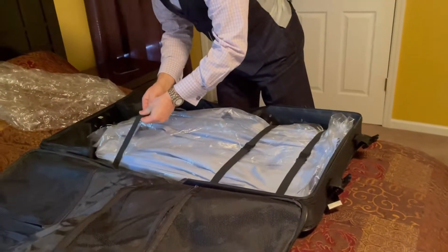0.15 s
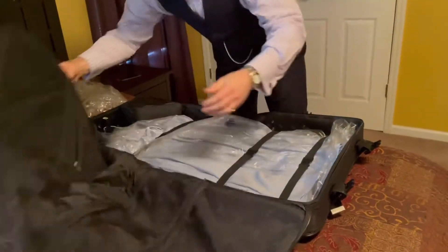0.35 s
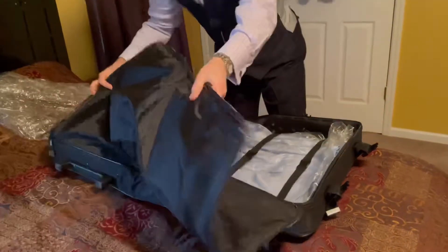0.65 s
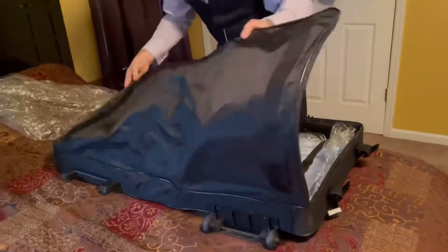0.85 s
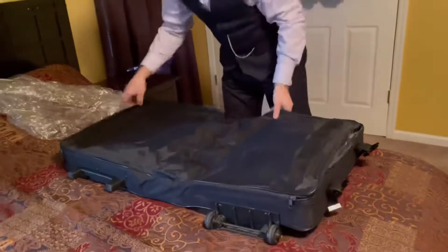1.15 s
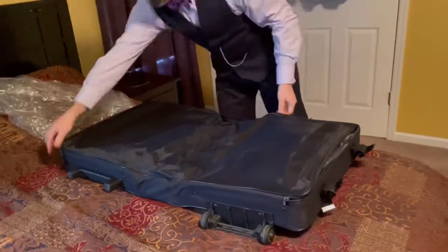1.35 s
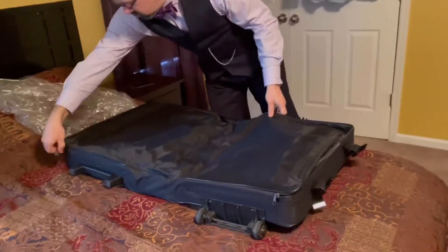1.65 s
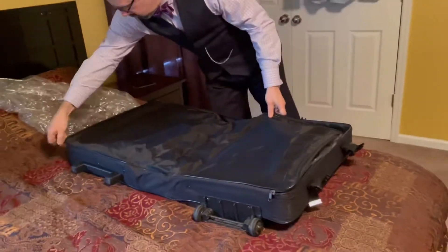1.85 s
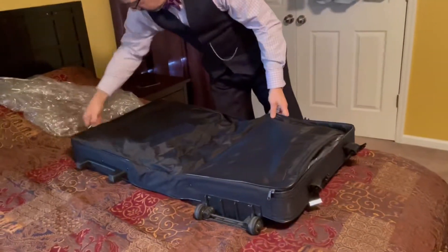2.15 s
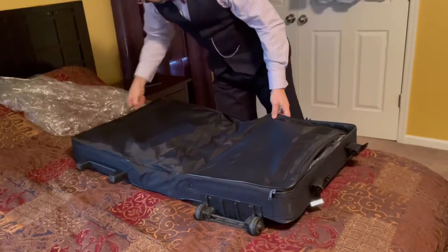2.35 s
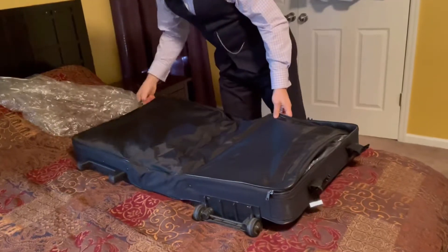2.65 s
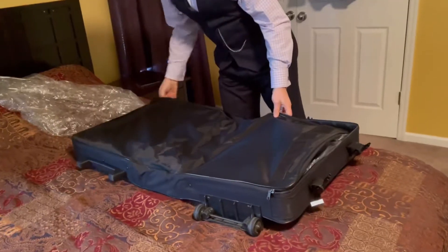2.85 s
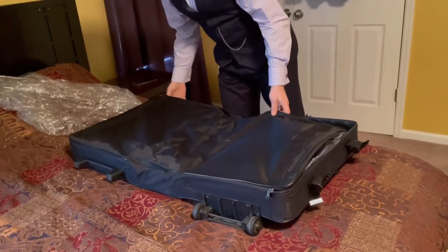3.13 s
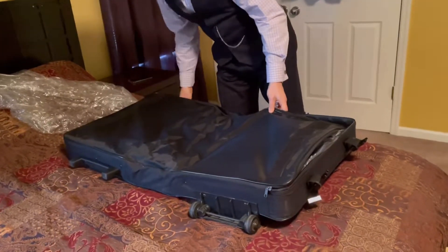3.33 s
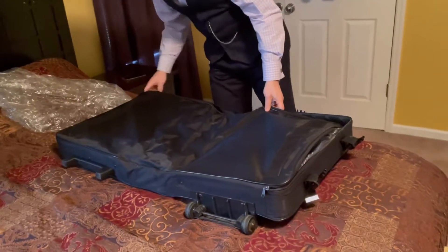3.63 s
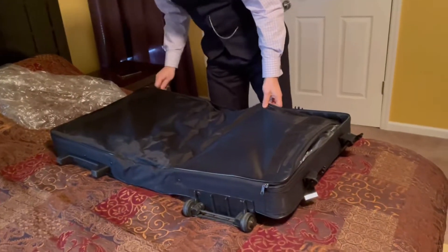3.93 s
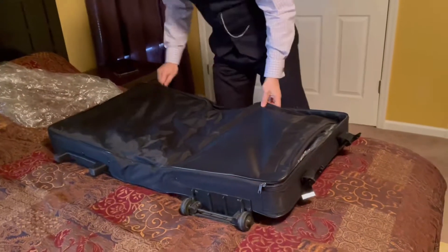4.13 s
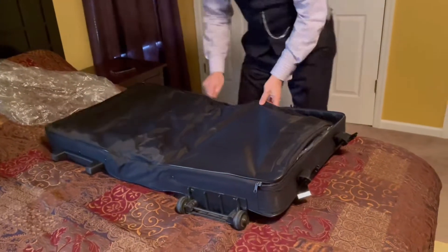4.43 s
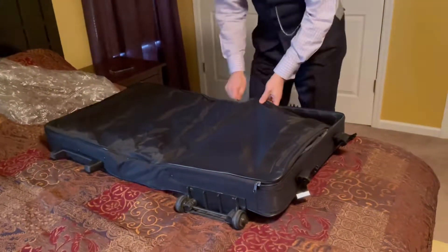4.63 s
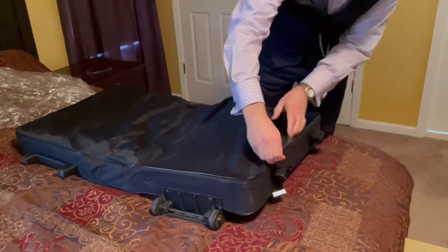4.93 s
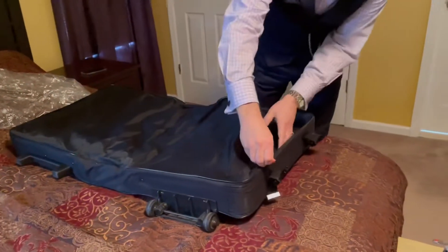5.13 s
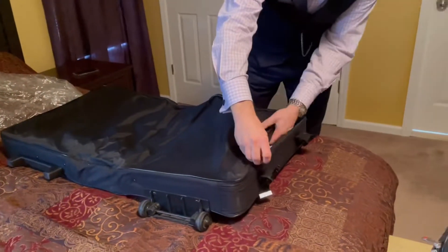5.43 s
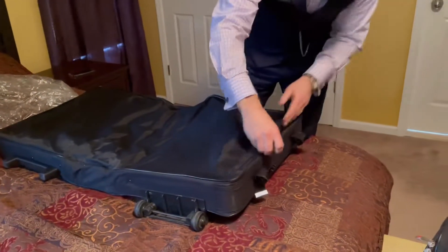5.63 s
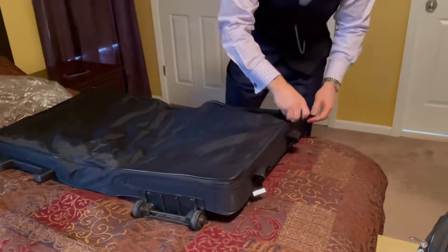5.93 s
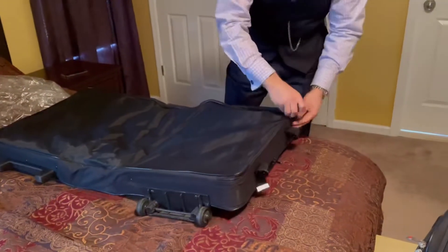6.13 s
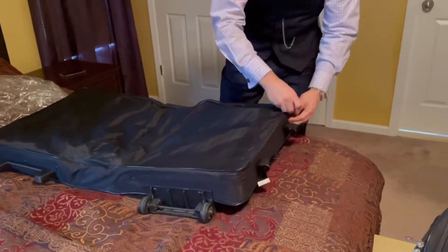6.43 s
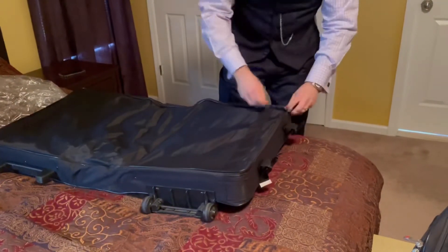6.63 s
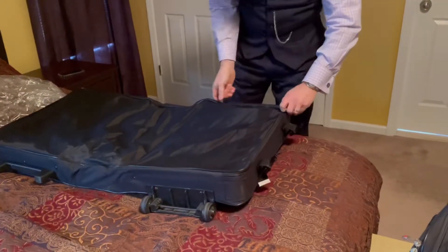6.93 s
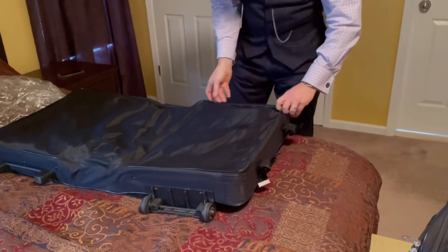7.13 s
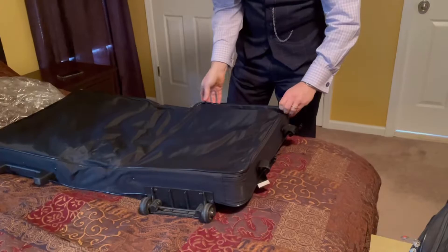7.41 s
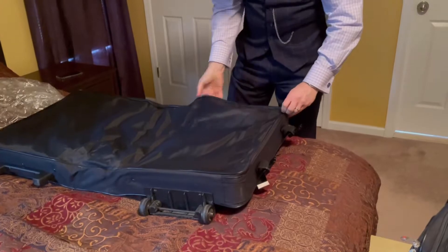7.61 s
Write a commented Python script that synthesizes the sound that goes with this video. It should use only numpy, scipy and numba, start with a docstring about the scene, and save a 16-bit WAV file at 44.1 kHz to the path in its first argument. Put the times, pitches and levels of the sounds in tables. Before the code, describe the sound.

Close stereo sound in a small, carpeted, dry bedroom. It is nearly silent until a tiny dropout near 0.3 s, then a nylon bag lid is flapped over: loud crisp rustles, rapid hard ticks and low bed thuds to about 1.1 s, softening to light cloth rubbing by 1.8 s. At 1.9 s the zipper starts, a nasal toothy buzz that rises and wavers in pitch until 2.4 s, briefly cut near 2.1 s. A short tug follows at 2.6-2.8 s, then quiet rustling. Brief low rasps come at 3.8-3.95 s, a brighter pull at 4.2-4.3 s running into a rougher, fading one until 4.6 s. After a brief cut at 4.7 s, fabric shuffles and ticks lead to a last buzzing pull at 5.5-5.8 s with strong rustling. Gentle cloth movement and small tab clicks continue to about 7.8 s, the ticks firmer near the end.

```python
"""Small carpeted bedroom, two close microphone ports at a soft nylon garment bag lying on a bed.
First the lid is flapped shut: filtered noise and crease snaps rustle, ringing bursts tick, bed and frame thud.
From 1.9 s to 5.8 s the zip is pulled in seven uneven tugs: a snap per tooth excites panel and slider.
Then gentle rustles and ticks of tab and cloth go on to the end.
The sound drops out briefly three times, near 0.3 s, 2.1 s and 4.7 s."""
import sys
import numpy as np
from scipy import signal
from scipy.fft import rfft, irfft
from scipy.io import wavfile
from scipy.ndimage import uniform_filter1d
from numba import njit

SR = 44100
rng = np.random.default_rng(int(sys.argv[2]) if len(sys.argv) > 2 else 0)


def put_to_file(sound):
    """Save the sound as 16-bit audio at rate SR, in the file named by the first command-line argument."""
    columns = np.atleast_2d(sound).T  # one column per channel
    safe = np.clip(columns, -1, 1)
    whole_steps = np.round(safe * 32767)
    wavfile.write(sys.argv[1], SR, whole_steps.astype(np.int16))


N = 342657

# Source levels below are those ahead of the mix gain, the room and the microphone.
# Dropouts: (from [s], to [s])
DROPOUTS = [(.255, 0.31), (2.085, 2.124), (4.674, 4.709)]
# Tone of the ports, straight between the rows: (frequency [Hz], gain [dB], left over right [dB])
MICROPHONE_TONE = [(2000, -1.5, -0.5), (3350, -3.5, -1.5), (4360, 1, 3.5), (5250, 4, 5), (7440, 0, -1.5),
                   (10040, 5.5, 2), (11100, -7.5, 2.5), (15000, -5.5, 0)]
PORT_LAG_S, TOP_HZ = 4e-5, 16100
ROOM_T60_S, ROOM_DB = 0.2, -11.5
# bed and bag scatter short waves unequally to the ports
SPREAD_T60_S, SPREAD_DB, SPREAD_HZ = 0.027, -5, 640

# Edges of the four cloth bands thud, flap, crease and hiss: (frequency [Hz])
BAND_EDGES_HZ = [20, 160, 800, 3500, 20000]
# Floor of each band up to the end of the first dropout: (level [dB])
OPENING_FLOOR_DB = [-71, -80.5, -88, -100]
# Floor of each band after it, heard when the hands rest: (level [dB])
RESTING_FLOOR_DB = [-68.5, -76, -80.5, -87.5]
# Colour of the cloth, shaping the inside of each band: (frequency [Hz], relative density [dB per Hz])
CLOTH_COLOUR = [(18, -58), (30, -21.5), (86, 2.5), (145, -1.5), (295, 1), (486, -1.5), (554, 0),
                (822, -7.5), (1390, -13.5), (2400, -16.5), (3000, -15), (3600, -15.5), (4080, -15),
                (9220, -19.5), (12000, -22.5), (14400, -12.5), (16000, -19.5)]
# Change of each band while a running zip pulls the cloth taut: (gain [dB])
TAUT_GAIN_DB = [0, -9, -10, -1]
# Most crease snapping beside the rubbing, for each band: (ratio [1])
CREASE_RATIO = [0, .15, .5, .65]
CRACKLE_POWER = .3  # firm handling crackles, gentle handling stays smooth
TAUT_LEAD_S = 0.021  # the hand tightens the cloth just before the slider moves
# Thud of bed and frame: (time [s], level [dB])
THUD_LEVEL = [(0.31, -52), (0.41, -60), (0.47, -43), (0.6, -68), (0.72, -51.5), (0.89, -63), (1.06, -48.5),
              (1.12, -67), (1.2, -53), (1.29, -70), (1.35, -53), (1.43, -66.5), (2.78, -60.5),
              (3.51, -72.5), (3.53, -60), (4.2, -59.5), (4.36, -51), (4.44, -63), (4.65, -53), (4.71, -74),
              (5.54, -65), (7.13, -62.5), (7.21, -91), (7.77, -61)]
# Rustles: (start [s], hold [s], level [dB], brightness of hiss over flap [dB], crease [dB])
CLOTH_RUSTLES = [(0.157, 0.01, -63, 31, 1.5), (0.311, 0.025, -38, -7.5, 1.5), (0.361, 0.023, -36, -5, 1),
                 (0.417, 0.05, -42, -2, 0.5), (0.484, 0.055, -42.5, -7.5, 3.5),
                 (0.598, 0.035, -47, -12.5, 2.5), (0.652, 0.012, -42.5, -13, -3),
                 (0.7, 0.013, -35.5, -15, 0.5), (0.728, 0.032, -39.5, -16.5, 1.5),
                 (0.816, 0.015, -49.5, -15, 1), (0.867, 0.044, -48, -12.5, 1),
                 (0.927, 0.017, -40, -20, 5.5), (0.975, 0.068, -46, -15, -2), (1.114, 0.063, -53, -13, 0.5),
                 (1.2, 0.09, -56, -13, 1), (1.302, 0.083, -53, -16.5, -3.5), (1.437, 0.073, -55, -16, 1),
                 (1.638, 0.055, -64.5, -16.5, 3.5), (1.71, 0.043, -54, -20, -1.5),
                 (1.768, 0.036, -56, -17.5, -1.5), (1.891, 0.19, -40, -29, -1.5),
                 (2.005, 0.077, -39.5, -20.5, -2), (2.1, 0.12, -47.5, -2, 0.5),
                 (2.163, 0.17, -40, -12.5, 1.5), (2.404, 0.22, -61.5, -12.5, -3.5),
                 (2.607, 0.09, -36, -22.5, 1.5), (2.727, 0.025, -45.5, -22, -2),
                 (2.82, 0.036, -52.5, -29, 6), (2.9, 0.0061, -72, -1, -15), (3.033, 0.026, -55, -16.5, -11),
                 (3.087, 0.038, -52, -14.5, -6.5), (3.149, 0.023, -59, -8, -0.5),
                 (3.216, 0.025, -55.5, -5.5, 4), (3.275, 0.046, -57.5, -7, -5.5),
                 (3.522, 0.086, -65, -17, -3), (3.584, 0.081, -56.5, -23, -4),
                 (3.695, 0.049, -48.5, -7.5, 3.5), (3.786, 0.015, -37, -27.5, 0.5),
                 (3.877, 0.045, -43.5, -19, 2), (3.918, 0.082, -55, -50, 2), (4.027, 0.12, -54, -21, -4.5),
                 (4.137, 0.054, -40, -19, -1), (4.164, 0.12, -33.5, -16.5, 5.5),
                 (4.298, 0.17, -38, -21.5, 7), (4.505, 0.088, -39.5, -18.5, 4), (4.71, 0.047, -62, -17, -2),
                 (4.793, 0.024, -50.5, -10.5, -3), (4.875, 0.068, -54, -11, -5),
                 (4.952, 0.031, -49.5, -13, -1), (5.082, 0.027, -46.5, -21, -4),
                 (5.163, 0.043, -44.5, -14.5, 1), (5.277, 0.083, -53.5, -12, -3.5),
                 (5.448, 0.05, -50, -9, -1), (5.492, 0.084, -33, -17.5, 4.5),
                 (5.612, 0.11, -32.5, -17, 10.5), (5.789, 0.075, -52, -23.5, 0.5),
                 (5.942, 0.064, -59, -13.5, -4.5), (6.104, 0.064, -55, -13, 4),
                 (6.23, 0.071, -61.5, -17, -2), (6.344, 0.076, -58, -9.5, -3),
                 (6.476, 0.1, -58.5, -15, 0.5), (6.607, 0.031, -59.5, -7, -4),
                 (6.698, 0.056, -63.5, -13.5, -3), (6.797, 0.013, -50.5, -14, -0.5),
                 (6.856, 0.079, -63.5, -10, -1.5), (6.973, 0.01, -51.5, -24.5, -0.5),
                 (7.03, 0.085, -60, -21, 6), (7.27, 0.02, -55, -29, 6.5), (7.409, 0.0099, -59.5, -11, 1),
                 (7.465, 0.0079, -47, -19, -0.5), (7.53, 0.064, -53.5, -7.5, 4),
                 (7.607, 0.05, -53, -5.5, 2), (7.664, 0.036, -48, -8.5, 1.5), (7.74, 0.02, -52.5, -31, 12)]
# Flap, crease and hiss in a rustle of brightness 0, before they are scaled to its level: (level [dB])
RUSTLE_SHARE_DB = [-7, -3, -5]
# How far brightness moves flap, crease and hiss: (lean [dB per dB])
RUSTLE_LEAN = [-.5, 0, .5]
# Dying away of flap, crease and hiss: (rate [dB per s])
RUSTLE_FALL = [238, 273, 260]
RISE_DB_PER_S = 951.5

# Ticks of tab, buckle and creases; knock and spark stand beside the ring:
# (time [s], ring peak [dB], ring frequency [Hz], knock [dB], spark [dB])
TICK_EVENTS = [(0.158, -48.5, 5660, -32, 16), (0.313, -21.5, 1810, -5, -18), (0.325, -23, 1510, -31, -34),
               (0.332, -20.5, 1700, -18, -28), (0.362, -28.5, 1400, -20, 3), (0.365, -28, 1500, -12, -12),
               (0.418, -24, 1450, -10, -10), (0.45, -37, 2920, -22, -14), (0.462, -27, 2000, -16, -20),
               (0.488, -33.5, 1310, 8, -25), (0.572, -51, 5000, -24, 15), (0.577, -31, 1300, -26, -5),
               (0.652, -23, 1740, -14, -26), (0.661, -25, 2510, -13, -13), (0.699, -18, 1510, -8, -26),
               (0.706, -34, 1000, -2, -15), (0.727, -21.5, 2470, -33, -3.5), (0.746, -24, 1380, -6, -32),
               (0.813, -34.5, 1540, -15, -9), (0.884, -26.5, 1290, -14, -28), (0.926, -26.5, 1610, -3, -4),
               (0.971, -28, 1660, -1.5, -23), (1.025, -37, 1110, -19, -30), (1.244, -47, 1510, -9, -18),
               (1.498, -40.5, 920, -20, 1), (1.691, -54.5, 1040, 11.5, -26), (1.858, -45.5, 1490, -4, -13),
               (1.91, -36.5, 995, -13, -8.5), (1.936, -35.5, 1010, -18, -6), (2.078, -44, 885, 11, -5),
               (2.365, -30.5, 1640, 0, -11), (2.817, -42.5, 1230, 6.5, -24), (2.854, -39, 2970, 3, -27),
               (3.085, -41.5, 1270, 0, -5), (3.108, -33.5, 1450, -32, -9), (3.223, -38, 2580, 1, -23),
               (3.691, -47, 2870, -24, -14), (3.982, -45, 902, -9, -25), (4.034, -51, 1270, -22, -57),
               (4.07, -49.5, 940, 5, -8), (4.126, -39, 1410, -15, -17), (4.371, -37.5, 1670, -30, 1.5),
               (4.516, -43, 1240, 7, -24), (4.707, -48, 1680, -3, -1), (4.783, -45, 1050, -4, -7),
               (4.897, -42, 1630, 1, -1.5), (4.963, -39, 1400, -18, -13), (4.975, -31.5, 1290, -14, -17),
               (5.064, -46, 1310, 7, -25), (5.084, -54, 1290, -18, -21), (5.103, -34, 1400, -14, -15),
               (5.17, -25.5, 1020, -36, -20), (5.199, -25.5, 1700, 0.5, -3), (5.33, -65, 1190, -15, -15),
               (5.446, -64, 1330, -3, -6), (5.468, -55, 910, -10, -15), (5.512, -26.5, 1900, 0.5, -18),
               (5.558, -27, 1250, -13, -29), (5.639, -32, 1380, -2, -23), (5.699, -42.5, 2330, 13.5, -20),
               (5.72, -43, 2260, -21, -20), (5.743, -27, 1210, -24, -23), (5.82, -33, 1080, -38, -21),
               (5.956, -41.5, 1630, -26, -29), (5.969, -45.5, 1230, 0, -23), (6.108, -45.5, 2000, -24, -17),
               (6.159, -37, 1170, -10, -14), (6.351, -36, 1240, -23, -33), (6.381, -54, 1500, -10, -8),
               (6.457, -61, 6000, -25, 5), (6.479, -42, 4520, -26, -14), (6.563, -49, 5100, -22, -11),
               (6.646, -43.5, 2570, -19, -32), (6.714, -52.5, 5000, -15, -9), (6.798, -42, 2630, -25, 3),
               (6.816, -43, 2600, -15, -13), (6.858, -47, 2870, 1, 6.5), (6.91, -49, 2590, -13, 2),
               (6.978, -52, 2620, -12, -4), (7.008, -47.5, 2640, -15, 1), (7.089, -50, 2560, -27, -23),
               (7.263, -59, 2600, -11, -20), (7.284, -46.5, 1470, -12, -21), (7.399, -60, 1100, -20, -23),
               (7.461, -44.5, 1280, -21, -8), (7.479, -56, 1700, -20, -25), (7.518, -41, 1390, -14, -11),
               (7.542, -51, 2040, 2, -25), (7.563, -45, 1830, -21, -14), (7.581, -42, 1300, -10, -25),
               (7.592, -40, 1050, -23, -17), (7.656, -32, 1430, -4, -31), (7.667, -40, 990, 1, -10),
               (7.693, -32, 1360, -28, -27), (7.747, -28.5, 1130, -18, -15)]
TICK_T60_S, CRACK_T60_S, AFTER = .03, .004, .28  # every tick cracks, then a weaker noise dies away
TAB_HZ, TAB_DB = 2815, -8.5  # the pull tab rings in every tick, peak beside the ring
SPARK_PAN, SPARK_CENTRE_DB = 0.054, -23.5  # brighter ticks lie further left, dB per dB

# The pull of the zip, one table a tug:
# (time [s], tooth rate [Hz], level [dB], brightness of the octave over the tooth tone [dB])
ZIP_TUGS = [
    [(1.9, 500.5, -88, -13), (1.91, 520, -44, -13), (1.994, 543.2, -45.5, -4.5), (2.032, 695.2, -39, -9),
     (2.085, 639.2, -35, -15), (2.128, 766.5, -38, -2), (2.146, 645, -35, -15), (2.16, 753, -30.5, -15),
     (2.173, 930, -36, -16), (2.197, 926.4, -51.5, -4), (2.214, 883.7, -36.5, -8), (2.244, 926.4, -36, -22),
     (2.256, 783.6, -34, -4), (2.27, 765.6, -35, -7), (2.28, 810.3, -33.5, -6.5), (2.3, 724.5, -38.5, -5.5),
     (2.318, 696, -38, 1), (2.33, 536, -37.5, -9), (2.342, 566, -44, -16), (2.378, 598, -46, 0)],
    [(2.605, 459, -60, -4), (2.624, 429.7, -38, -9), (2.634, 602, -36.5, -19), (2.643, 689.4, -32.5, -19),
     (2.66, 582, -31.5, -13), (2.684, 576, -38, -1), (2.694, 663, -43, -2), (2.715, 634.5, -44.5, 0),
     (2.745, 592, -51.5, 1), (2.79, 561, -51, -1)],
    [(3.78, 571, -52, -10), (3.81, 516, -33.5, -18), (3.824, 510, -34.5, -18), (3.85, 530, -65, 5)],
    [(3.87, 293, -42, -20), (3.89, 302, -41.5, -30), (3.916, 313, -70, 11), (3.938, 328, -40, -19),
     (3.95, 347, -86, 9)],
    [(4.175, 1264, -44, 18), (4.185, 1221, -37, 20), (4.21, 1143, -34, 23), (4.235, 1128, -41.5, 14),
     (4.245, 1208, -41, 4), (4.258, 1419, -32, 20), (4.27, 1525, -44, 15), (4.278, 1450, -52, 6),
     (4.288, 1377, -39, 8), (4.305, 1287, -41, 4)],
    [(4.312, 513, -37.5, -22), (4.36, 494, -43, -11), (4.39, 469.4, -45, 9), (4.4, 643.4, -54, 23),
     (4.432, 630, -39.5, -17), (4.49, 569, -67, -16), (4.536, 554.5, -59, -1), (4.602, 614, -40.5, -9.5),
     (4.63, 646, -59, -14)],
    [(5.505, 633, -49, -6), (5.52, 594.8, -41.5, -5), (5.535, 586, -41.5, 10), (5.548, 642, -41, 6),
     (5.572, 665, -43.5, 9), (5.586, 764.6, -46, 9), (5.603, 838.4, -52, 14), (5.62, 884.5, -57, -1),
     (5.632, 764, -40, -30), (5.66, 743.3, -41, -30), (5.676, 732, -39, -21), (5.706, 845, -45, -18),
     (5.728, 863, -47, -32), (5.735, 676, -46, -23), (5.75, 603, -36.5, -44), (5.8, 506, -46.5, -41)],
]
# Slider beside the level, for each tug, before it dulls with the octave: (level [dB])
TUG_SLIDER_DB = [-12, -13, -18.5, -15.5, -9, -4.5, 4]
# Irregular placing of the teeth, for each tug: (share of a tooth's spacing [1])
TUG_JITTER = [.045, .05, .03, .03, .05, .04, .014]
# Wavering of the speed, for each tug: (share of the tooth rate [1])
TUG_UNSTEADY = [.025, .025, .022, .022, .018, .022, .009]
# Drag of the tape beside the teeth, for each tug: (ratio [1])
TUG_RASP = [.8, .85, .75, .75, .7, .7, .6]
# Buzz of the panel beside the octave, for each tug: (level [dB])
TUG_PANEL_DB = [0, -3, -8, -8, -14, -8, -8]
WOBBLE_PER_S, PATCHES_PER_S, PATCHY_DB = 110, 45, 3.5  # the lines waver and break up
TOOTH_SCATTER_DB = 1.8
SLIDER_TOP_HZ = 3600
BODY_UNDER_DB = 25  # buzz of the slider's metal under the level, before the slider dulls
SLIDER_FOLLOW = 0.4  # the slider dulls with the octave, dB per dB


def undb(db):
    """Amplitude ratio of a level in dB."""
    return 10 ** (np.asarray(db) / 20)


def unit(x):
    """Scale to an RMS of 1."""
    return x / np.sqrt(np.mean(x ** 2))


@njit
def svf(x, hz, width):
    """State-variable band-pass whose centre may move, gain 1 at the centre."""
    y, band, low = np.empty(len(x)), 0., 0.
    for i in range(len(x)):
        g, k = np.tan(np.pi * hz[i] / SR), width[i] / hz[i]
        v = (band + g * (x[i] - low)) / (1 + g * (g + k))
        band, low, y[i] = 2 * v - band, low + 2 * g * v, k * v
    return y


def ring(x, hz, width_hz):
    """A resonance given by numbers or by curves."""
    one = np.ones(len(x))
    return svf(x, hz * one, width_hz * one)


def ring_twice(x, hz, width_hz):
    """Two equal resonances in series, for steeper skirts."""
    return ring(ring(x, hz, width_hz), hz, width_hz)


def walk(rate, count=N):
    """Random levels held 1 / rate s and slewed; spread near 1."""
    k = max(int(SR / rate), 2)
    return uniform_filter1d(np.repeat(rng.standard_normal(2000), k)[:count], k)


def decay(t, t60):
    """Exponential decay by 60 dB in t60 seconds."""
    return np.exp(-np.log(1000) * t / t60)


def room(x, split_hz=700, bass_apart=0.49):
    """Decaying reflections; long waves reach both ports nearly alike, short ones differ."""
    t = np.arange(SR // 3) / SR
    tail = rng.standard_normal((2, len(t))) * decay(t, ROOM_T60_S) * (t > .003)
    tail /= np.sqrt(np.sum(tail[0] ** 2))
    apart = signal.lfilter(*signal.butter(1, split_hz, "high", fs=SR), tail[1]) + bass_apart * tail[1]
    return undb(ROOM_DB) * np.array([signal.fftconvolve(x, tail[0] + k * apart)[:N] for k in (1, -1)])


def spread(x):
    """The first scattered sound, of opposite sign at the two ports."""
    t = np.arange(SR // 10) / SR
    tail = rng.standard_normal(len(t)) * decay(t, SPREAD_T60_S)
    tail /= np.sqrt(np.sum(tail ** 2))
    tail = signal.lfilter(*signal.butter(2, SPREAD_HZ, "high", fs=SR), tail)
    return undb(SPREAD_DB) * signal.fftconvolve(x, tail)[:N] * np.array([[1], [-1]])


def hands():
    """Gain of thud, flap, crease and hiss: every rustle rises, holds and dies away; powers add."""
    start, hold, db, bright_db, crease_db = np.transpose(CLOTH_RUSTLES)[:, :, None]
    t, fine = np.arange(0, N / SR + .01, .002), np.arange(N) / SR
    parts = [undb(share + lean * bright_db) for share, lean in zip(RUSTLE_SHARE_DB, RUSTLE_LEAN)]
    parts[1] = parts[1] * undb(crease_db)
    total = np.sqrt(sum(part ** 2 for part in parts))
    gains = [undb(np.interp(fine, *np.transpose(THUD_LEVEL))) * (fine > THUD_LEVEL[0][0])]
    for part, fall in zip(parts, RUSTLE_FALL):
        drop_db = np.maximum((start - t) * RISE_DB_PER_S, (t - start - hold) * fall)
        each = part / total * undb(db - np.maximum(0, drop_db))
        gains.append(np.interp(fine, t, np.sqrt(np.sum(each ** 2, axis=0))))
    return gains


def cloth(grains_per_s=280, grain_db=2.0, flicker_db=2, quick_db=3.0):
    """Nylon rubbing with tiny crease snaps; thud, flap, crease and hiss each follow the hands."""
    hz = np.fft.rfftfreq(N, 1 / SR) + 1
    colour_hz, colour_db = np.transpose(CLOTH_COLOUR)
    colour = undb(np.interp(np.log(hz), np.log(colour_hz), colour_db))
    t, out = np.arange(N) / SR, 0
    zipping = sum(1. * (t > rows[0][0] - TAUT_LEAD_S) * (t < rows[-1][0]) for rows in ZIP_TUGS)
    zipping = uniform_filter1d(zipping, SR // 100)
    floors = np.transpose([OPENING_FLOOR_DB, RESTING_FLOOR_DB])
    bands = zip(BAND_EDGES_HZ, BAND_EDGES_HZ[1:], hands(), TAUT_GAIN_DB, CREASE_RATIO, floors)
    for lo, hi, gain, taut_db, share, (opening_db, resting_db) in bands:
        size = undb(grain_db * np.clip(rng.exponential(size=N), 0, 3))
        grains = (rng.random(N) < grains_per_s / SR) * size * rng.choice([-1, 1], N)
        # every crease rings briefly, at a pitch that wanders about the middle of the band
        crease_hz = np.clip(np.sqrt(lo * hi) * undb(5.53 * walk(60)), 30, 15000)
        creases = unit(ring_twice(grains, crease_hz, 0.43 * crease_hz))
        crackle = share * (1 - .6 * zipping) * (gain / gain.max()) ** CRACKLE_POWER
        source = rfft(rng.standard_normal(N) + crackle * creases) * colour
        part = irfft(source / (1 + (lo / hz) ** 8) / (1 + (hz / hi) ** 8), N)
        gain = gain * undb(taut_db * zipping + flicker_db * walk(25) + quick_db * walk(90))
        floor = undb(np.where(t > DROPOUTS[0][1], resting_db, opening_db))
        out = out + unit(part) * np.hypot(gain, floor)
    return out


def ticks(knock_hz=500, spark_hz=6000):
    """Each tick: a sharp snap, a short ring, the tab, a dull knock of the panel and a bright spark."""
    out = np.zeros((2, N + SR))
    t = np.arange(SR // 20) / SR
    envelope = decay(t, CRACK_T60_S) + AFTER * decay(t, TICK_T60_S)
    for s, db, hz, knock_db, spark_db in TICK_EVENTS:
        pan_db = SPARK_PAN * (spark_db - SPARK_CENTRE_DB)
        burst = rng.standard_normal(len(t)) * envelope + 2 * (t == 0)
        # (frequency [Hz], width [Hz], peak [dB])
        parts = ((hz, 0.78 * hz, 0), (TAB_HZ, 900, TAB_DB), (knock_hz, 700, knock_db), (spark_hz, 9000, spark_db))
        sound = 0
        for part_hz, width_hz, part_db in parts:
            part = ring_twice(burst, part_hz, width_hz)
            sound = sound + undb(part_db) * part / np.abs(part).max()
        at = int(s * SR)
        out[:, at:at + len(t)] += sound * undb(db + np.array([[pan_db], [-pan_db]]) / 2)
    return out[:, :N]


def tug(rows, slider_db, jitter, unsteady, rasp, panel_db, sharp=0.15, force_db=0.5,
        panel_hz=1500, slider_hz=2500, slider_width_hz=2300):
    """One pull: a snap per tooth; the panel sings the rate and its octave, the slider rings higher."""
    s, *columns = np.transpose(rows)
    t = np.arange(s[0], s[-1], 1 / SR)
    hz, db, bright_db = (np.interp(t, s, c) for c in columns)
    tone_db, octave_db = db - np.maximum(bright_db, 0), db + np.minimum(bright_db, 0)
    # the slider binds and lets go: speed and force waver
    hz = hz * (1 + unsteady * walk(WOBBLE_PER_S, count=len(t)))
    teeth = np.cumsum(hz) / SR
    chance = rng.standard_normal((2000, 2))[:int(teeth[-1])]
    place = np.interp(np.arange(len(chance)) + jitter * chance[:, 0], teeth, np.arange(len(t)))
    place = np.clip(place, 0, len(t) - 2)
    # each snap is shared between the two nearest samples
    snaps, size = np.zeros(len(t)), undb(TOOTH_SCATTER_DB * chance[:, 1])
    np.add.at(snaps, place.astype(int), size * (1 - place % 1))
    np.add.at(snaps, place.astype(int) + 1, size * (place % 1))
    tone, octave = (unit(ring_twice(snaps, k * hz, k * sharp * hz)) for k in (1, 2))
    # uneven teeth keep a fixed panel resonance buzzing beside the octave
    buzz = ring_twice(snaps * rng.standard_normal(len(t)), panel_hz, 250)
    octave = octave + undb(panel_db) * unit(buzz)
    # tape dragged through the slider rasps in the same two bands and blurs the lines
    drag = rng.standard_normal(len(t))
    tone = unit(tone + rasp * unit(ring_twice(drag, hz, 300)))
    octave = unit(octave + rasp * unit(ring_twice(drag, 2 * hz, 300)))
    slider = ring_twice(snaps, slider_hz, slider_width_hz)
    slider = signal.sosfilt(signal.butter(6, SLIDER_TOP_HZ, fs=SR, output="sos"), slider)
    # its metal body buzzes at two fixed pitches
    rough = snaps * (1 + drag[::-1])
    body = unit(ring_twice(rough, 3900, 690)) + unit(ring_twice(rough, 5000, 730))
    slider = unit(unit(slider) + undb(-BODY_UNDER_DB - slider_db) * body)
    fade = np.clip(np.minimum(t - t[0], t[-1] - t) / 0.001, 0, 1)
    force = undb(force_db * walk(WOBBLE_PER_S, count=len(t)))
    tone, octave, slider = (x * undb(patchy_db * walk(PATCHES_PER_S, count=len(t)))
                            for x, patchy_db in ((tone, 2.0), (octave, PATCHY_DB), (slider, PATCHY_DB)))
    slider_level_db = db + slider_db + SLIDER_FOLLOW * (octave_db - db)
    mix = undb(tone_db) * tone + undb(octave_db) * octave + undb(slider_level_db) * slider
    out, at = np.zeros(N), int(s[0] * SR)
    out[at:at + len(t)] = fade * force * mix
    return out


def scene():
    """Cloth, ticks and zip close to the ports, with scattering and the room added."""
    pulls = zip(ZIP_TUGS, TUG_SLIDER_DB, TUG_JITTER, TUG_UNSTEADY, TUG_RASP, TUG_PANEL_DB)
    near = cloth() + ticks() + sum(tug(*pull) for pull in pulls)
    return undb(-2.5) * (near + room(near.mean(0)) + spread(near.mean(0)))


def record(dry):
    """Ports colour the sound, the right one hears later; it drops out at the gaps; the top is cut."""
    hz = np.fft.rfftfreq(N, 1 / SR)
    at, *columns = np.transpose(MICROPHONE_TONE)
    db, lean_db = (np.interp(np.log(hz + 1), np.log(at), c) for c in columns)
    lag = np.exp(-2j * np.pi * hz * PORT_LAG_S)
    left = irfft(rfft(dry[0]) * undb(db + lean_db / 2), N)
    right = irfft(rfft(dry[1]) * undb(db - lean_db / 2) * lag, N)
    t = np.arange(N) / SR
    # each dropout closes over 4 ms and opens over 1 ms
    gates = [np.clip(np.maximum((a - t) / .004, (t - b) / .001), .003, 1) for a, b in DROPOUTS]
    heard = np.array([left, right]) * np.prod(gates, axis=0)
    return signal.sosfilt(signal.ellip(10, .2, 80, TOP_HZ, fs=SR, output="sos"), heard)


dry = scene()
out = record(dry)
put_to_file(out)
```